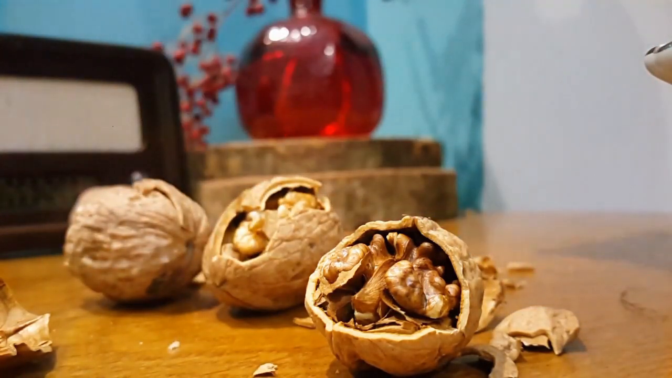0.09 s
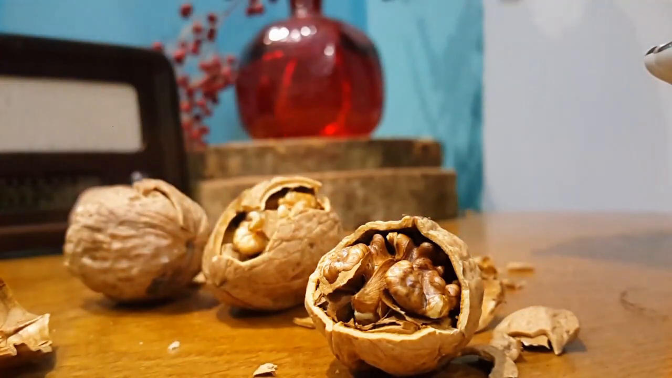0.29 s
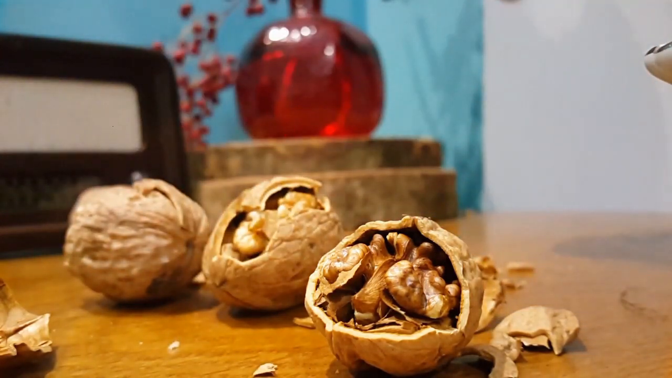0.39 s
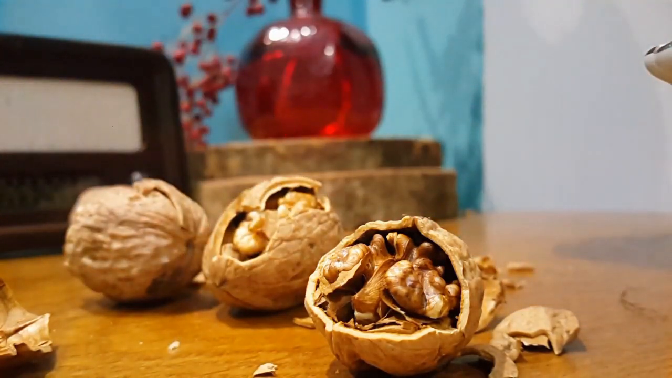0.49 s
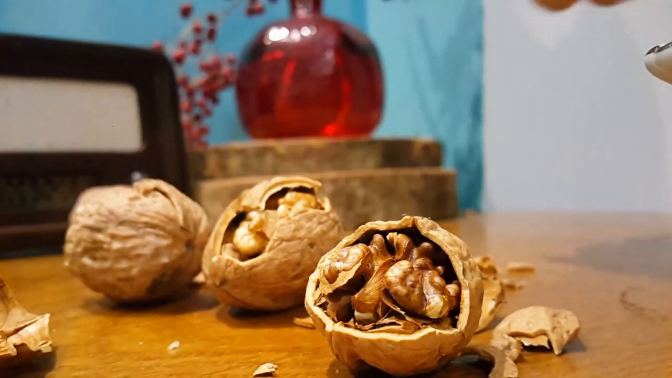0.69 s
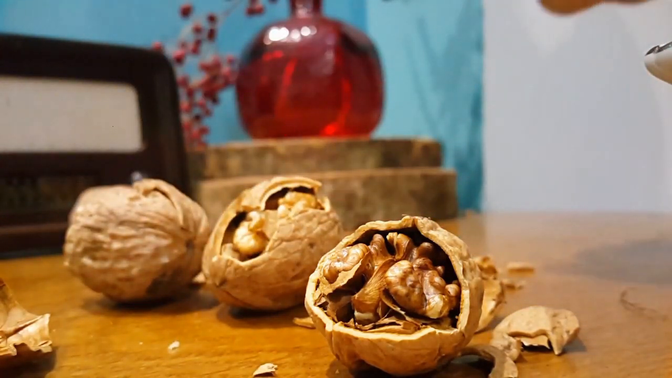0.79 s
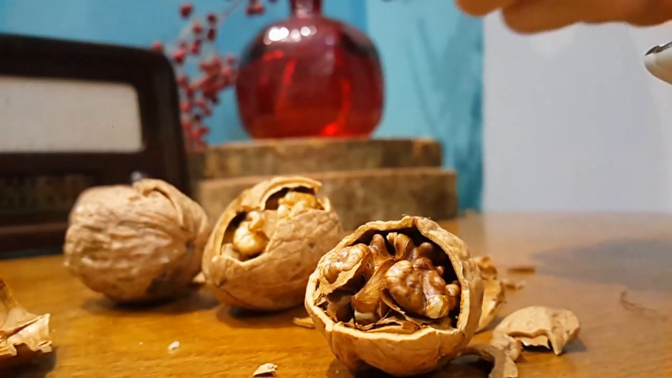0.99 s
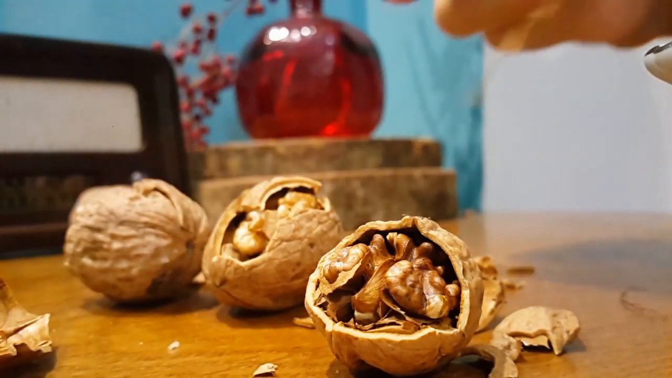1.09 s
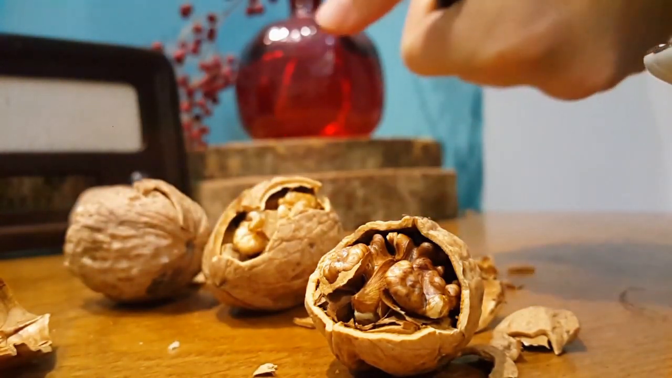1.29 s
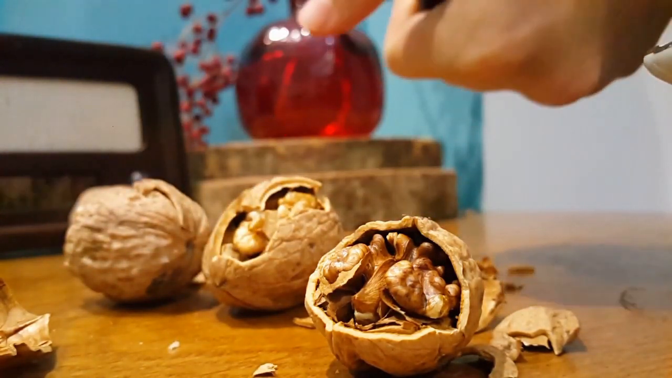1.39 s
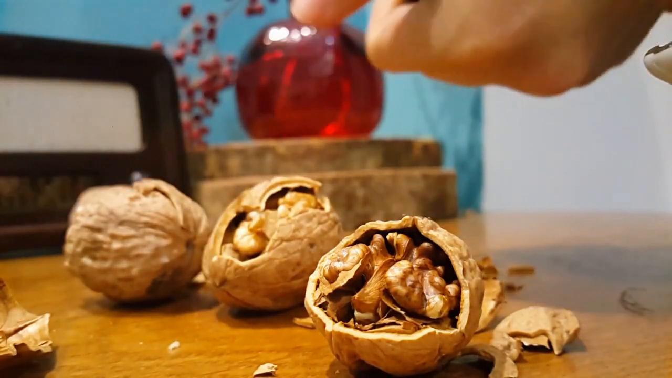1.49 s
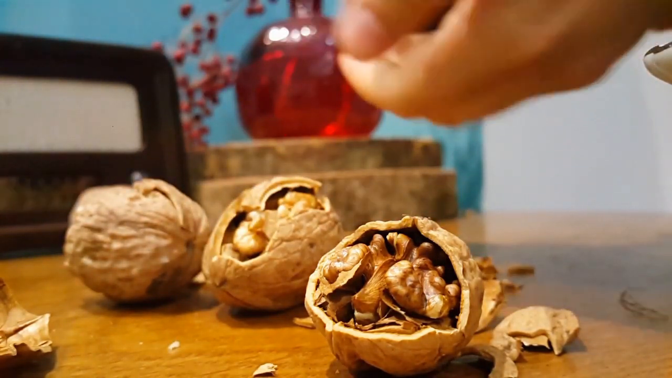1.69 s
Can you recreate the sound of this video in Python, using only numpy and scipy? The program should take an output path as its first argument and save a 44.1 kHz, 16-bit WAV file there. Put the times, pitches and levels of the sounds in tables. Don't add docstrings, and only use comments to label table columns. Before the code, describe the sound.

Sharp walnut cracks with brittle splinters and dull table knocks, over a faint fridge hum

```python
import sys
import numpy as np
from scipy import signal
from scipy.fft import rfft, irfft
from scipy.io import wavfile

SR = 44100
rng = np.random.default_rng(int(sys.argv[2]) if len(sys.argv) > 2 else 0)


def decibels_to_gain(level_db):
    exponent = np.asarray(level_db, float) / 20
    return 10 ** exponent


def wav_record(signal):
    frames = np.transpose(np.atleast_2d(signal))
    bounded = np.clip(frames, -1, 1)
    quanta = np.round(bounded * 32767).astype(np.int16)
    wavfile.write(sys.argv[1], SR, quanta)


N = 77175


def ring(x, hz, width_hz):
    return signal.lfilter(*signal.iirpeak(min(hz, 0.45 * SR), hz / width_hz, fs=SR), x)


def double_ring(x, hz, width_hz):
    return ring(ring(x, hz, width_hz), hz, width_hz)


def unit(x):
    return x / np.sqrt(np.mean(x ** 2))


def peak(x):
    return np.abs(x).max(axis=-1, keepdims=True)


def left_right(pan_db):
    return decibels_to_gain(np.array([[pan_db], [-pan_db]]) / 2)


def place(out, x, s):
    i = int(s * SR)
    return out + np.pad(x, ((0, 0), (i, N)))[:, :N]


def stereo_noise(alike):
    noise = rng.standard_normal((3, N))
    alike = np.clip(alike, 0, 1)
    return np.sqrt(alike) * noise[0] + np.sqrt(1 - alike) * noise[1:]


def shell(x, body):
    out = 0
    for k, (hz, width_hz, db) in enumerate(body):
        out = out + (-1) ** k * decibels_to_gain(db) * ring(x, hz, width_hz) * np.sqrt(1000 / width_hz)
    return out


def cracks(rows, body, pan_db, lag_ms, decay_ms, snap_db):
    rise_ms, unshared = 0.25, 0.71
    splinter_hz, splinter_top_hz = 2700, 13450
    ms = np.arange(SR // 20) * 1000 / SR
    shape = (1 - np.exp(-ms / rise_ms)) ** 2 * np.exp(-ms / decay_ms)
    shape = unit(shape) / np.sqrt(len(ms))
    snap = signal.unit_impulse(len(ms), int(rise_ms * SR / 1000))
    fizz = signal.butter(2, [splinter_hz, splinter_top_hz], "band", fs=SR, output="sos")
    radiated = np.array([unit(shell(snap, body)), unit(signal.sosfilt(fizz, snap))])
    near, send = np.zeros((2, N)), np.zeros((2, N))
    for s, db, bright_db, wet_db in rows:
        grit = rng.standard_normal((3, len(ms)))
        burst = (grit[0] + unshared * grit[1:]) * shape
        rung = shell(burst + decibels_to_gain(snap_db) * snap, body)
        rung = decibels_to_gain(db) * rung / peak(rung)
        fine = signal.sosfilt(fizz, burst)
        fine = decibels_to_gain(db + bright_db - 4) * fine / peak(fine)
        strength = np.array([[rung.std()], [fine.std()]])
        send = place(send, decibels_to_gain(wet_db) * radiated * strength, s)
        left, right = rung + fine
        late_left = np.interp(ms - max(lag_ms, 0), ms, left, left=0)
        late_right = np.interp(ms - max(-lag_ms, 0), ms, right, left=0)
        near = place(near, np.array([late_left, late_right]) * left_right(pan_db), s)
    return near, send


def thumps():
    # (t/s, peak level/dB, f/Hz, decay/ms)
    blows = [
        (0.116, -25, 127, 1.8),
        (0.2, -22, 276, 2.1),
        (0.239, -39, 198, 4.8),
        (.448, -49.5, 180, 4),
        (.822, -31, 302, 1.1),
        (0.853, -34, 304, 1.6),
        (1.072, -21, 143, 2.83),
        (1.0732, -22, 417, 1.9),
        (1.482, -29.5, 394, 1.14),
    ]
    lag_ms, pan_db = 0.2, 7
    out = np.zeros((2, N))
    t = np.maximum(np.arange(SR // 10) / SR - np.array([[0], [lag_ms / 1000]]), 0)
    for s, db, hz, decay_ms in blows:
        swing = -np.sin(2 * np.pi * hz * t) * np.exp(-t * 1000 / decay_ms)
        out = place(out, decibels_to_gain(db) * left_right(pan_db) * swing, s)
    return out


def hinge():
    # (t/s, length/s, f/Hz, level/dB)
    squeaks = [
        (.254, .032, 4000, -46),
        (.454, .029, 4200, -43),
        (.610, .066, 2060, -52),
    ]
    width, edge_s, rough = 0.021, 0.002, 0.5
    t, out = np.arange(N) / SR, np.zeros(N)
    for s, length, hz, db in squeaks:
        gate = np.clip(np.minimum(t - s, s + length - t) / edge_s, 0, 1)
        tone = np.sqrt(2) * np.sin(2 * np.pi * hz * t)
        chatter = unit(double_ring(rng.standard_normal(N), hz, hz * width))
        out = out + decibels_to_gain(db) * gate * unit(tone + rough * chatter)
    return out


def walls(send):
    # (f/Hz, time to fall 60 dB/s, level/dB)
    kitchen = [(470, 0.23, 7.5), (1080, 0.51, 3.5), (1850, 0.54, 1), (3900, 0.45, 3.5), (7670, 0.41, 0),
               (14000, 0.34, -1.5)]
    delay_ms, build_ms, alike = 4.7, 3.4, 0.1
    t = np.maximum(np.arange(N) / SR - delay_ms / 1000, 0)
    echo = np.zeros((2, N))
    for hz, t60, db in kitchen:
        band = unit(double_ring(stereo_noise(alike), hz, hz * 1.15))
        echo = echo + decibels_to_gain(db - 60 * t / t60) * band * np.sqrt(hz / 2000)
    echo = echo * (1 - np.exp(-t * 1000 / build_ms))
    echo = echo / np.sqrt(np.sum(echo ** 2) / 2)
    return signal.fftconvolve(echo, send[None], axes=1)[:, :N] * decibels_to_gain(5)


def fridge():
    # (f/Hz, level/dB)
    hum = [(99.5, -59.5), (199, -68), (298, -58.5), (390, -61.5), (545, -63.5), (630, -63.5)]
    # (f/Hz, level per Hz/dB)
    air_colour = [(18, -30), (30, -13), (673, -5), (1170, -11), (1260, -9), (1680, -18), (2360, -19.5),
                  (2910, -20.5), (15500, -30)]
    hum_width_hz, air_db = 17, -52
    lines = np.zeros((2, N))
    for hz, db in hum:
        lines = lines + decibels_to_gain(db) * unit(double_ring(stereo_noise(0.79), hz, hum_width_hz))
    f = np.maximum(np.fft.rfftfreq(N, 1 / SR), 1)
    points_hz, points_db = np.transpose(air_colour)
    colour = decibels_to_gain(np.interp(np.log(f), np.log(points_hz), points_db))
    bass = np.clip(400 / f, 0, 1)
    mixed = rfft(stereo_noise(0.96)) * bass + rfft(stereo_noise(0.067)) * (1 - bass)
    return lines + decibels_to_gain(air_db) * unit(irfft(mixed * colour, N))


def scene():
    # (t/s, peak level/dB, splinter brightness/dB, room send/dB)
    first_cracks = [
        (.144, -14.5, 0, -11.5),
        (.152, -43, -1, -15),
        (.172, -18.5, 5, -17),
        (.3025, -21.5, 0, -10),
    ]
    knocks = [
        (.2004, -15, -11, -2),
        (.2022, -3.5, -22, -8),
        (.2385, -21.5, -30, -7),
    ]
    jaw_ticks = [
        (0.1144, -39.5, -21, -13),
        (0.4489, -25, -7, -10),
        (0.5201, -25.5, -20, -17.5),
    ]
    second_cracks = [
        (0.7231, -9.5, -0.5, -14.5),
        (.7304, -24.5, 9.5, -8),
        (0.7908, -13, -4, -34),
        (.8200, -32, 3, 8),
        (.8217, -6, 2, -6),
        (.8535, -9.5, 5.5, -14.5),
        (.9807, -36.5, 19.5, -15),
    ]
    shatter = [
        (1.0642, -24, 16.5, -5),
        (1.066, -12.5, 9, -4.5),
        (1.0690, -20.5, 10.5, -4),
        (1.0720, -0.5, -3.5, -6.5),
        (1.0745, -11, -8, -6),
    ]
    last_cracks = [
        (1.2943, -13.5, 1, -15),
        (1.3341, -31.5, 13, -14),
        (1.433, -40, 8, -9),
        (1.4512, -35, 9, -18.5),
        (1.4570, -27.5, 13.5, -15.5),
        (1.4667, -35, 5, -15.5),
        (1.4828, -5, -5.5, -11),
    ]
    # (f/Hz, width/Hz, level/dB)
    first_shell = [(2040, 160, 0.5), (3920, 470, 4.5), (5170, 1300, 2)]
    knock_body = [(566, 340, -26.5), (920, 260, -24), (1123, 140, -34), (1400, 330, -25.5), (1860, 110, -9),
                  (1946, 66.5, 6.5), (2098, 110, -4.5), (2900, 1200, -19.5), (4040, 100, -19),
                  (5120, 780, -25)]
    jaw = [(1260, 180, -3), (2090, 100, 6), (2600, 110, -8), (3100, 190, 3)]
    second_shell = [(1010, 660, -18.5), (1450, 400, -12.5), (2075, 86, 0.5), (2384, 220, -8),
                    (3056, 170, -12.5), (3894, 270, -7.5), (5220, 1400, -13), (6850, 180, -11.5)]
    open_shell = [(920, 690, -17), (1300, 275, -7.5), (1787, 310, -0.5), (2354, 560, -0.5), (3005, 220, -3),
                  (5520, 230, -10.5), (7270, 530, -6.5)]
    last_shell = [(990, 360, -21), (1428, 214, -3), (1820, 253, 1.5), (2300, 130, -9.5), (2730, 300, -2),
                  (5830, 270, -5), (8250, 1300, -4)]
    # (pan to the left/dB, left lag/ms, burst decay/ms, snap over grit/dB)
    places = [
        (-0.5, -0.061, 1.8, -5),
        (-2, 0.058, 2.75, -7),
        (1.5, -0.366, 2.4, -26),
        (1.4, -0.36, 2.02, 2.5),
        (8.2, .5, 1.63, 5),
        (4.8, -0.0294, 1.92, 8),
    ]
    # (t/s, gain/dB)
    phone_gain = [(0, -1), (.2, -3), (.25, -2), (.72, -1.5), (.86, -6.5), (1.06, -8.5), (1.1, -8.5),
                  (1.47, -16.5), (1.518, -13.5), (1.75, -15.5)]

    events = (first_cracks, knocks, jaw_ticks, second_cracks, shatter, last_cracks)
    bodies = (first_shell, knock_body, jaw, second_shell, open_shell, last_shell)
    parts = [cracks(rows, body, *spot) for rows, body, spot in zip(events, bodies, places)]
    near = sum(direct for direct, send in parts)
    rung, fine = sum(send for direct, send in parts)
    squeak = hinge()
    echo = walls(rung + decibels_to_gain(-22) * squeak) + walls(fine)
    gain = decibels_to_gain(np.interp(np.arange(N) / SR, *np.transpose(phone_gain)))
    return near + echo * left_right(-0.5) + squeak + thumps() + gain * fridge()


def limiter(x):
    limit_db, ratio, rise_ms, fall_ms = -22.5, 1.2, 15, 55
    keep_rise, keep_fall = np.exp(-1000 / (np.array([rise_ms, fall_ms]) * SR))
    heard = np.abs(x).mean(axis=0)
    heard = signal.lfilter([1 - keep_rise], [1, -keep_rise], heard)
    heard = np.maximum(heard, signal.lfilter([1 - keep_fall], [1, -keep_fall], heard))
    return x * np.minimum(decibels_to_gain(limit_db) / (heard + 1e-9), 1) ** (1 - 1 / ratio)


def microphones(dry):
    low = signal.butter(2, 54, "high", fs=SR, output="sos")
    top = signal.butter(6, 15600, fs=SR, output="sos")
    return signal.sosfilt(np.vstack([low, top]), dry)


def low_pass(x):
    return signal.sosfilt(signal.butter(12, 16650, fs=SR, output="sos"), x)


def record(dry):
    rounded = np.tanh(0.82 * limiter(dry)) / 0.77
    return low_pass(microphones(rounded))


dry = scene()
out = record(dry)
wav_record(out)
```